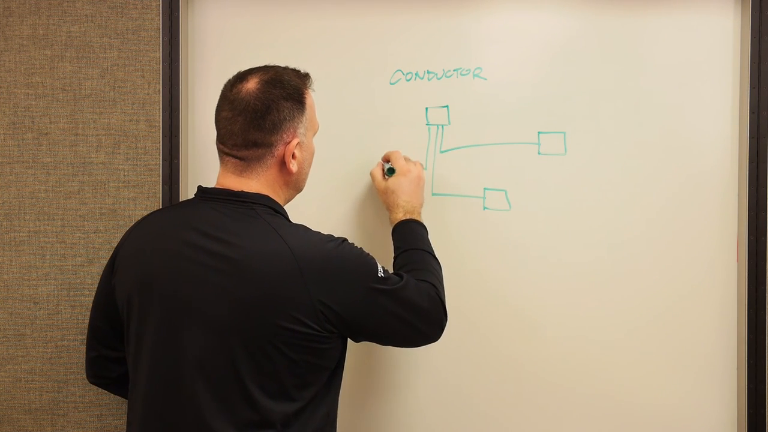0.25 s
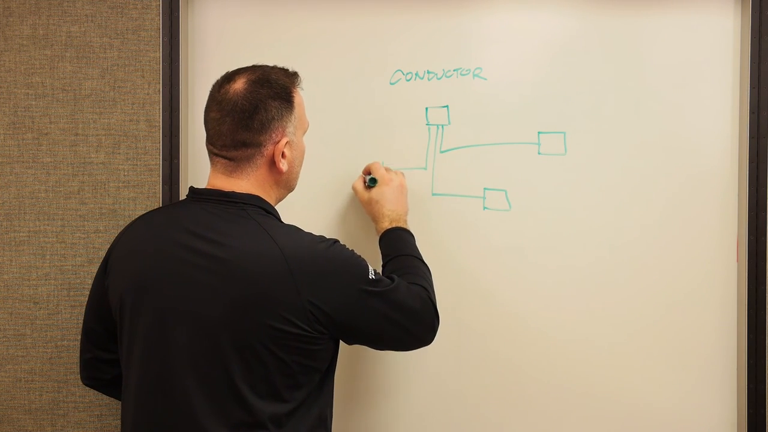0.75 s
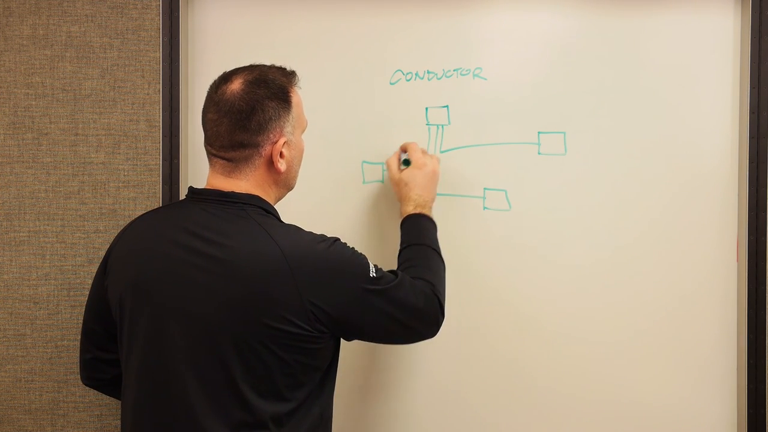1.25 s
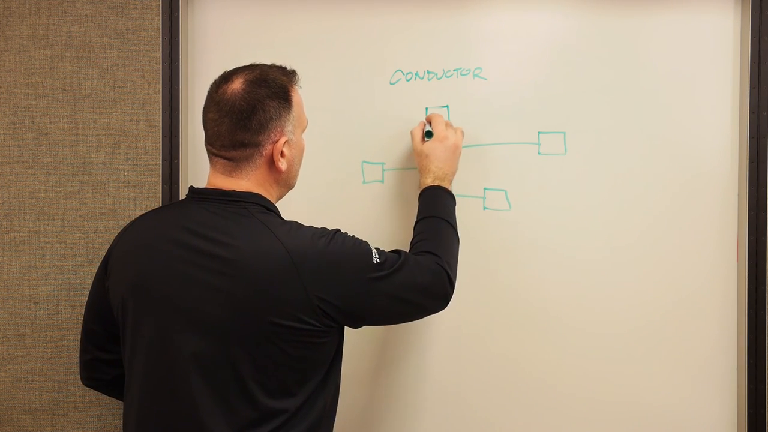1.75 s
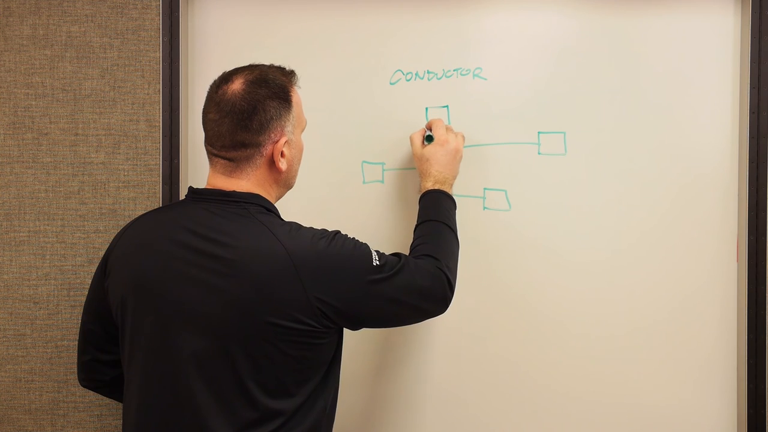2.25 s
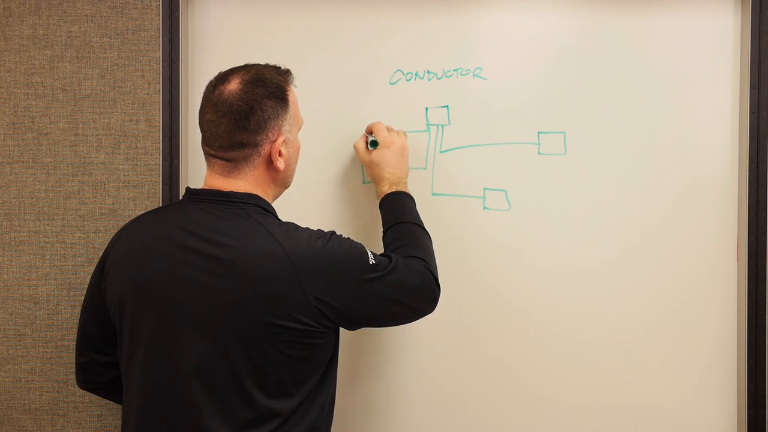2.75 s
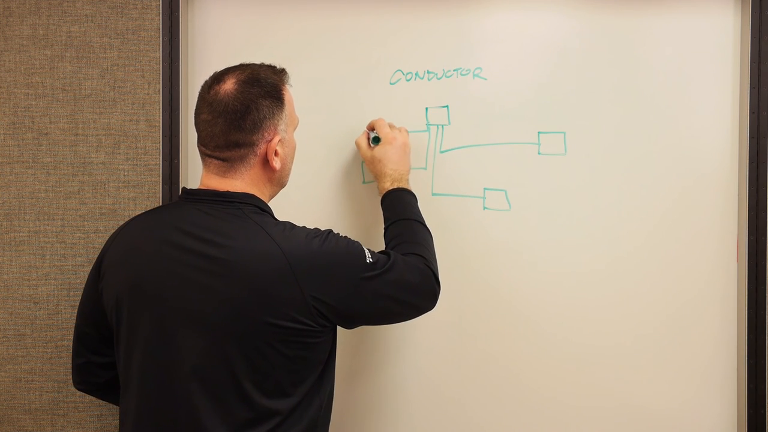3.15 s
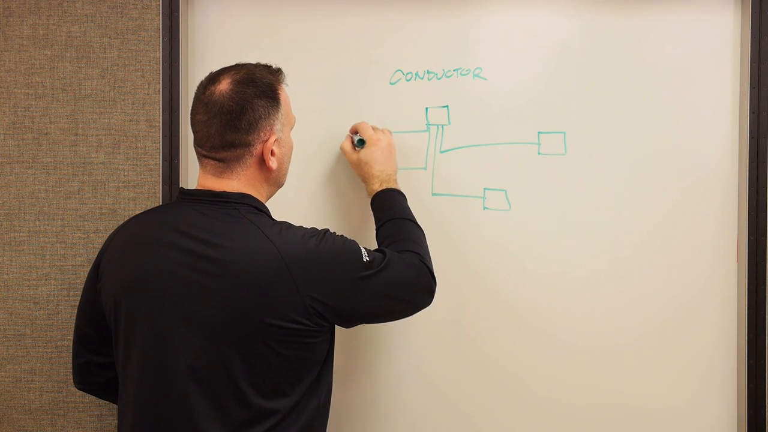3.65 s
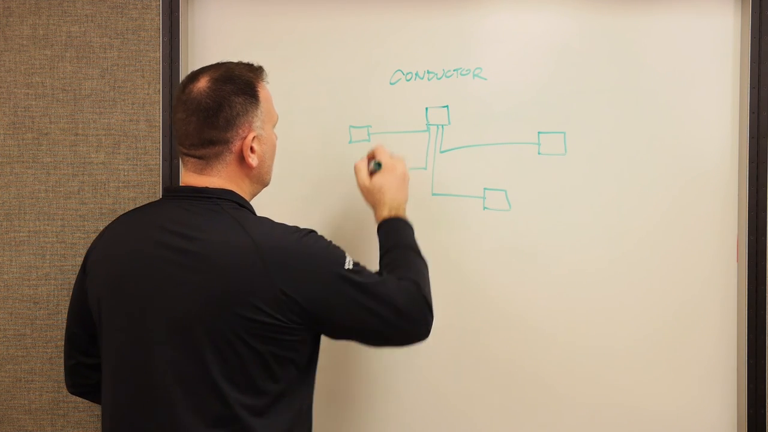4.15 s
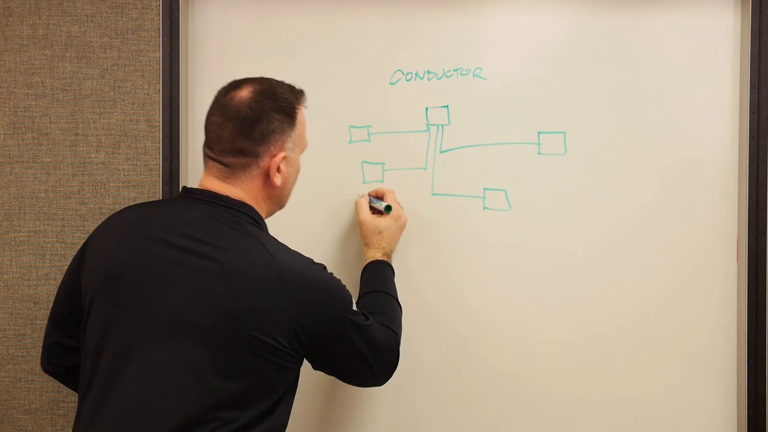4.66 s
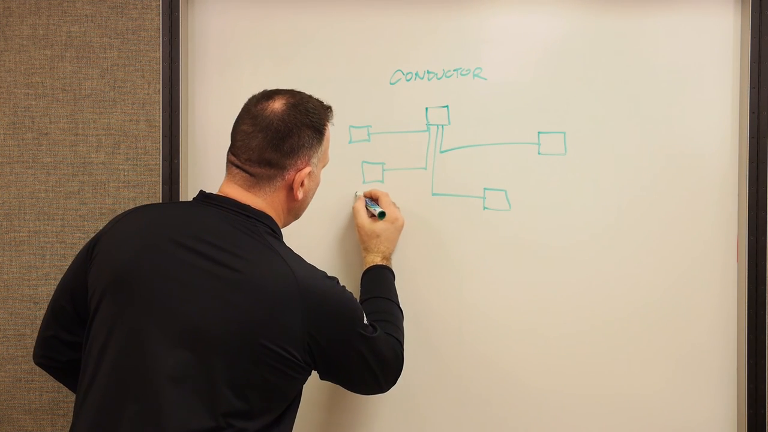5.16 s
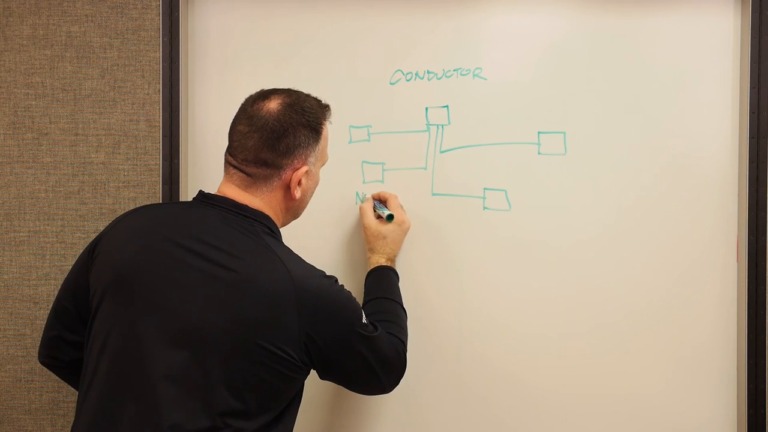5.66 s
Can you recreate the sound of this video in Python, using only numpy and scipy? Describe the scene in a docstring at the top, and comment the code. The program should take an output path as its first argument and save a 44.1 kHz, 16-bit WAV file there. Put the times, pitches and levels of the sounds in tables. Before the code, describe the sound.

A felt-tip marker gives short squeaks and papery hisses on a whiteboard in a quiet room, with pauses, soft knocks and faint ventilation.

```python
"""In a small, quiet meeting room someone draws small boxes and a connecting line on a whiteboard.
The felt tip squeaks as it sticks and slips: each squeak is a gliding stack of eight overtones.
Between squeaks the sliding felt hisses (grainy coloured noise) and the panel rumbles (low noise and thumps).
The marker knocks and clicks (ringing tones and a short crack), a sleeve rustles and the arm bumps softly.
Close reflections, a short room tail, ventilation noise and a faint stereo hiss surround it all."""
import sys
import numpy as np
from scipy import signal
from scipy.fft import rfft, irfft, next_fast_len
from scipy.io import wavfile

SR = 44100
rng = np.random.default_rng(int(sys.argv[2]) if len(sys.argv) > 2 else 0)


def master(y):
    """Save y as 16-bit WAV."""
    cut = np.clip(np.atleast_2d(y).T, -1, 1)
    pcm = np.round(cut * 32767)  # scale
    wavfile.write(sys.argv[1], SR, pcm.astype(np.int16))


N = 260190   # length in samples, 5.9 s


def from_db(db):
    """Turn decibels into a gain."""
    return 10 ** (np.asarray(db) / 20)


def rms_one(x):
    """Scale a signal to an rms (average strength) of one."""
    return x / np.sqrt(np.mean(x ** 2) + 1e-20)


def at_hz(points, hz):
    """Read a spectrum in dB at any frequency, with straight lines on a log-frequency axis."""
    known_hz, db = np.transpose(points)
    return np.interp(np.log(np.maximum(hz, 1)), np.log(known_hz), db)


def coloured(x, spectrum):
    """Filter a signal so that each frequency gets the gain of the spectrum."""
    size = next_fast_len(len(x))
    gains = from_db(at_hz(spectrum, np.fft.rfftfreq(size, 1 / SR)))
    return irfft(rfft(x, size) * gains, size)[:len(x)]


def noise(spectrum):
    """Make steady coloured noise with an rms of one."""
    return rms_one(coloured(rng.standard_normal(N), spectrum))


def drift(rate_hz):
    """Wander slowly at random, with an rms of one: white noise through two equal low-pass steps."""
    r = np.exp(-2 * np.pi * rate_hz / SR)
    wander = signal.lfilter([1], [1, -2 * r, r * r], rng.standard_normal(N + SR))
    return rms_one(wander[SR:])   # the first second lets the filter settle


def swell(start_s, end_s, attack_s, release_s, change_db=0):
    """Gain of one gesture: it grows, holds while its level slowly changes, and dies away."""
    t = np.arange(N) / SR
    before = np.maximum(start_s - t, 0) / attack_s
    after = np.maximum(t - end_s, 0) / release_s
    change = from_db(np.interp(t, [start_s, end_s], [0, change_db]))
    return np.exp(-np.minimum(before + after, 20)) * change


def together(gains):
    """Add gains in power, as unrelated noises add."""
    return np.sqrt(sum(g ** 2 for g in gains))


BLOW_SPREAD_DB = 1.5   # random spread of each tone's strength from blow to blow


def struck(events, modes):
    """A struck object rings at its own tones; each blow excites every tone with a strength of its own."""
    s, level_db = np.transpose(events)
    spread_db = BLOW_SPREAD_DB * rng.standard_normal((len(s), len(modes)))
    strengths = from_db(level_db[:, None] + spread_db)
    out = np.zeros(N)
    for k, (hz, db, t60_s) in enumerate(modes):
        blows = np.full(N, 1e-18)   # a tiny floor instead of zeros
        sign = (-1) ** k   # neighbouring tones start in opposite directions
        blows[np.round(s * SR).astype(int)] = strengths[:, k] * from_db(db) * sign
        r = from_db(-60 / (t60_s * SR))   # decay per sample
        w = 2 * np.pi * hz / SR
        out += signal.lfilter([0, np.sin(w)], [1, -2 * r * np.cos(w), r * r], blows)
    return out


SWELL_DB, FADE_DB = 11.5, 14   # a squeak starts and ends this far under its crest
SWELL_SHAPE, FADE_SHAPE = 1.5, 1.1   # powers that round the two sides of its arch


def arch(u, crest):
    """Level in dB along a squeak (u runs 0-1): it swells to its crest and fades."""
    crest = np.clip(crest, .02, .98)
    before = np.maximum(1 - u / crest, 0)
    after = np.maximum((u - crest) / (1 - crest), 0)
    return -SWELL_DB * before ** SWELL_SHAPE - FADE_DB * after ** FADE_SHAPE


def glide(start_s, length_s, first_hz, last_hz, bend, crest, overtone_crest, first_db, even_db, odd_db, count=41):
    """Course of one squeak, a bent glide under an arch of level, in rows like the wavering squeak's."""
    u = np.linspace(0, 1, count)
    pitch = first_hz + (last_hz - first_hz) * u / (u + abs(bend) * (1 - u))
    fundamental = first_db + arch(u, crest)
    overtones = arch(u, overtone_crest)
    return np.transpose([start_s + length_s * u, pitch, fundamental, even_db + overtones, odd_db + overtones])


# Squeaks: the pitch glides up as the tip speeds up and down as it brakes; slow slips make low chirps.
# Each row: start in seconds, length in seconds, first pitch in Hz, last pitch in Hz,
# bend (under 1 glides early, over 1 late), loudest point of the fundamental (0-1 of the length),
# loudest point of the overtones (0-1), relative levels of fundamental, even and odd overtones in dB,
# and the change for each overtone above the fourth in dB.
SQUEAK_GLIDES = [(0.0, 0.01, 1677, 1457, 3.4, 0.38, 0.07, -17.5, -29, -33.5, -1),
                 (0.015, 0.017, 1274, 760, 1.75, .3, .2, -23.5, -47, -51, -1),
                 (0.456, 0.008, 1790, 1593, 0.28, 0.73, 0.6, -46, -53.5, -63, -4),
                 (0.522, .068, 1648, 1918, 0.96, 0.42, 0.23, -37.5, -42, -42.5, -15),
                 (0.667, 0.02, 1830, 1523, 1.5, 0.34, 0.56, -31.5, -35, -37.5, -3.5),
                 (0.691, 0.013, 1425, 1026, 0.67, 0.11, 0.1, -38.5, -70, -62, -8),
                 (0.759, 0.091, 1633, 1883, 1.78, 0.87, 0.79, -33, -33.5, -33, -0.6),
                 (0.924, .051, 1756, 1308, 2.5, 0.69, 0.85, -35, -43, -38.5, 0.9),
                 (0.973, 0.015, 1392, 1814, 1.08, 1, 0.8, -44.5, -53.5, -64, -2),
                 (2.443, 0.02, 895, 1540, 0.5, 1, 1, -51, -59.5, -54, -13),
                 (2.465, 0.044, 1610, 1800, 0.65, 0.33, 0.37, -35, -37.5, -47, -9.5),
                 (2.782, 0.017, 1732, 1520, 1.5, 0.44, 0.62, -42.5, -42, -49.5, -3),
                 (2.795, .026, 1465, 724, 0.46, 0.16, 0.3, -27, -46, -56, -4.5),
                 (3.397, 0.04, 1780, 1852, .4, 0.14, .4, -63, -71, -88, -5),
                 (3.549, 0.016, 1780, 1570, 0.59, .55, 0.3, -44, -54.5, -75, -7),
                 (3.818, 0.023, 1326, 1076, 3.7, 0.73, 0.94, -41.5, -62, -62, -6)]
# One longer squeak wavers as the hand hesitates. Each row: time in seconds, slip rate in Hz,
# then relative levels of the fundamental, even overtones and odd overtones in dB.
WAVERING_COURSE = [(3.607, 1400, -48, -58, -46), (3.615, 1410, -49, -72, -49), (3.621, 1676, -55, -41, -51),
                   (3.633, 1643, -46.5, -41, -46), (3.642, 1340, -48.5, -57, -45),
                   (3.657, 1307, -42.5, -55, -42), (3.665, 1578, -31.5, -40.5, -33),
                   (3.676, 1681, -33, -42.5, -38), (3.693, 1788, -35.5, -41.5, -45),
                   (3.702, 1850, -44, -50.5, -63)]
WAVERING_SOFTNESS_DB = -1.3   # per overtone above the fourth
# The fundamental is strongest near the tip's resonance. Each row: pitch in Hz, gain in dB.
TIP_RESONANCE = [(750, -6), (1100, -0.5), (1400, 0.5), (1640, -1.5), (1720, -0.5), (1810, 2), (1920, 6)]
# How tip and barrel give off the overtones. Each row: frequency in Hz, gain in dB.
BARREL_RESPONSE = [(1700, -0.5), (2700, 2), (3350, 1.5), (4300, -9.5), (5300, -4), (5900, 2), (6750, 0),
                   (7700, -7.5), (8700, -8.5), (9500, -21.5), (12000, -28), (14000, -45.5)]
PURE_HZ, PURE_DB_PER_HZ = 1817, -0.0583   # faster slips than this lose their overtones


def squeaks(jitter, shimmer_db, slow_hz, slow_roughness, slow_rounding_db, attack_s, release_s, level_db, count=8):
    """The tip sticks and slips in a steady cycle, which grows ragged and round when the slips come slowly."""
    t, out = np.arange(N) / SR, np.zeros(N)
    wobble = drift(500)
    flutter = [drift(160) for _ in range(count)]
    courses = [(glide(*row[:-1]), row[-1]) for row in SQUEAK_GLIDES]
    courses.append((WAVERING_COURSE, WAVERING_SOFTNESS_DB))
    for rows, softness_db in courses:
        s, slip_hz, first_db, even_db, odd_db = np.transpose(rows)
        on = (t > s[0] - attack_s) & (t < s[-1] + release_s)
        now = t[on]
        pitch = np.interp(now, s, slip_hz)
        slow = np.clip(1 - pitch / slow_hz, 0, 1)
        uneven_pitch = pitch * (1 + (jitter + slow_roughness * slow) * wobble[on])
        phase = 2 * np.pi * np.cumsum(uneven_pitch) / SR
        fade_in = 1 + (now - s[0]) / attack_s
        fade_out = 1 - (now - s[-1]) / release_s
        gate = np.clip(np.minimum(fade_in, fade_out), 0, 1) ** 2
        for k in range(1, count + 1):   # k = 1 is the fundamental
            course_db = first_db if k == 1 else odd_db if k % 2 else even_db
            db = np.interp(now, s, course_db)
            if k == 1:
                db = db + at_hz(TIP_RESONANCE, pitch)
            else:
                db = db + PURE_DB_PER_HZ * np.maximum(pitch - PURE_HZ, 0)
                db = db + at_hz(BARREL_RESPONSE, k * pitch)
                db = db + max(k - 4, 0) * softness_db
                db = db + (k - 2) * slow * slow_rounding_db
            lag = np.pi * k * k / count   # the barrel delays each overtone differently
            gain = gate * from_db(db + shimmer_db * flutter[k - 1][on])
            out[on] += gain * np.sqrt(2) * np.cos(k * phase - lag)
    return from_db(level_db) * out


# Strokes of the felt on the board, which also make the panel rumble.
# Each row: start in seconds, end in seconds, relative hiss level in dB,
# relative panel rumble level in dB, change of level along the stroke in dB.
PEN_STROKES = [(0.0, 0, -75, -51.5, 3), (0.393, 0.453, -69.5, -67.5, 6.5), (0.556, 0.657, -50.5, -51, -1.5),
               (0.807, 0.903, -52.5, -49, -4.5), (0.945, 1.004, -65, -57, 3.5),
               (1.017, 1.137, -60, -69, -0.5), (2.504, 2.787, -49, -51, -4.5), (3.438, 3.537, -59, -61, 3),
               (3.657, 3.701, -52, -49, -1), (3.73, 3.858, -74.5, -66.5, 7), (3.902, 4.007, -63.5, -77, 5)]
# Colour of the felt sliding on its flat, broader and lower.
# Each row: frequency in Hz, relative level per hertz in dB.
FLAT_FELT_COLOUR = [(600, -28.5), (1500, 0), (1850, -3), (2400, -16.5), (3400, -3), (4300, -12.5),
                    (4950, -15.5), (5300, -3.5), (5800, 1), (6800, 3), (7200, -6.5), (7700, -1.5),
                    (9200, -18), (11000, -36)]
# Colour of the felt sliding on its edge. Each row: frequency in Hz, relative level per hertz in dB.
EDGE_FELT_COLOUR = [(600, -37), (1550, -12), (1900, -10.5), (2150, -7), (2950, -19), (3550, -5.5),
                    (4200, -15), (5500, -16.5), (6100, 4.5), (6900, 1), (7700, -5.5), (8600, -21),
                    (9500, -15.5), (10600, -49)]
# The tip sings faintly near its resonance while it slides.
# Each row: frequency in Hz, relative level per hertz in dB.
SINGING_COLOUR = [(1600, -29.5), (1800, -7.5), (1890, 3.5), (1980, -7.5), (2200, -29.5), (3400, -28.5),
                  (3700, -11.5), (4000, -28.5), (5000, -51.5)]
TIP_TURNS_S = 1.8   # flat of the tip before this time, edge after it
FELT_GRAIN_DB = 1.7   # random unevenness of the snags
STROKE_ATTACK_S, STROKE_RELEASE_S = 0.015, .014   # time constants of the hiss


def sliding_felt(level_db, singing_db):
    """Fibres snag at random and excite tip and barrel; the first box is drawn with the flat of the tip."""
    drag = together(from_db(db) * swell(start, end, STROKE_ATTACK_S, STROKE_RELEASE_S, change)
                    for start, end, db, _, change in PEN_STROKES)
    snags = rng.standard_normal(N) * from_db(FELT_GRAIN_DB * drift(161))
    flat = rms_one(coloured(snags, FLAT_FELT_COLOUR))
    edge = rms_one(coloured(snags, EDGE_FELT_COLOUR))
    hiss = np.where(np.arange(N) / SR < TIP_TURNS_S, flat, edge)
    singing = from_db(singing_db) * noise(SINGING_COLOUR)
    return from_db(level_db) * drag * (hiss + singing)


# Moves of the arm, which stir the panel and rustle the sleeve. Each row: time in seconds,
# time constant in seconds, relative sleeve rustle level in dB, relative low rumble level in dB.
ARM_GESTURES = [(2.26, .17, -77, -60.5), (4.001, 0.34, -74.5, -60.5), (4.34, .07, -97.5, -58),
                (4.588, 0.038, -58.5, -56), (4.705, 0.094, -70.5, -56.5), (5.065, .02, -74.5, -61),
                (5.43, 0.065, -85.5, -65), (5.53, 0.055, -72, -75), (5.635, 0.017, -82, -74)]
# Colour of the rumble. Each row: frequency in Hz, relative level per hertz in dB.
RUMBLE_COLOUR = [(20, -14.5), (33, -10), (45, -10), (58, -6.5), (74, 5), (86, 1), (110, -3.5), (125, 1),
                 (146, -2), (175, -8), (260, -9), (400, -17.5), (900, -18.5), (2000, -37)]
# The tip catching or letting go nudges the whole panel. Each row: time in seconds, strength in dB.
PANEL_NUDGES = [(.012, -52.5), (.675, -50.5), (2.792, -55), (3.665, -55)]
# Tones of the nudged panel. Each row: frequency in Hz, relative level in dB, seconds to fall by 60 dB.
PANEL_TONES = [(29.9, 3, .12), (46, -3, 0.23), (69, -1.5, 0.27)]
PANEL_ATTACK_S, PANEL_RELEASE_S, PANEL_REST_DB = 0.067, 0.13, -72.5   # time constants, level at rest


def panel(level_db):
    """The board drums softly while it is rubbed or the arm moves, and thumps when the tip nudges it."""
    rubbed = [from_db(db) * swell(start, end, PANEL_ATTACK_S, PANEL_RELEASE_S, change)
              for start, end, _, db, change in PEN_STROKES]
    stirred = [from_db(db) * swell(s, s, width, width) for s, width, _, db in ARM_GESTURES]
    motion = together(rubbed + stirred + [from_db(PANEL_REST_DB)])
    rumble = from_db(level_db) * motion * noise(RUMBLE_COLOUR)
    return rumble + struck(PANEL_NUDGES, PANEL_TONES)


# Ventilation and microphone hiss. Each row: frequency in Hz, relative level per hertz in dB.
AIR_COLOUR = [(20, -3.5), (45, 7.5), (60, 7), (73, 14), (90, 12.5), (125, 5), (145, 15), (180, 7), (260, 5),
              (400, -2.5), (900, -3), (2500, -4), (8000, -5), (16000, -7)]


def air(level_db):
    """Ventilation and microphone hiss make a steady coloured noise."""
    return from_db(level_db) * noise(AIR_COLOUR)


# Hiss that differs between the channels. Each row: frequency in Hz, relative level per hertz in dB.
SIDE_HISS_COLOUR = [(35, -10.5), (90, -9.5), (350, 2), (700, 1.5), (1400, -2), (3000, -0.5), (15000, -0.5)]


def side_hiss(level_db):
    """The same noise goes to both channels with opposite signs, so it sounds wide."""
    return from_db(level_db) * noise(SIDE_HISS_COLOUR) * np.array([[1], [-1]])


# Reflections from nearby surfaces. Each row: delay in seconds, level in dB.
CLOSE_ECHOES = [(.0031, -26.5), (.0074, -10), (0.0119, -13)]
# Colour of the reverberation. Each row: frequency in Hz, gain in dB.
TAIL_COLOUR = [(200, -5), (850, -15.5), (1150, -20), (1600, -16), (1900, -14.5), (3400, -22), (5000, -20),
               (7000, -30.5), (14000, -34)]
ROOM_T60_S = 0.26   # time in which the tail falls by 60 dB


def room(x, first_wall_s, build_s):
    """A few close, dulled reflections, then a short diffuse tail that is weak in the treble."""
    t = np.arange(SR // 2) / SR
    tail = rng.standard_normal(len(t)) * from_db(-60 * t / ROOM_T60_S)
    tail *= np.clip((t - first_wall_s) / build_s, 0, 1)
    response = coloured(tail / np.linalg.norm(tail), TAIL_COLOUR)
    dull = signal.sosfilt(signal.butter(1, 3000, fs=SR, output="sos"), x)
    samples = np.arange(N)
    early = sum(from_db(db) * np.interp(samples - delay * SR, samples, dull, left=0)
                for delay, db in CLOSE_ECHOES)
    return x + early + signal.fftconvolve(x, response)[:N]


# The marker knocks, landing on the board or shifting in the fingers.
# Each row: time in seconds, relative strength in dB.
MARKER_CLICKS = [(0.5153, -39.5), (3.6064, -45), (4.2674, -43), (4.2869, -32), (4.309, -44), (5.435, -47.5)]
# Tones of the marker. Each row: frequency in Hz, relative level in dB, seconds to fall by 60 dB.
MARKER_TONES = [(986, -2, 0.044), (1310, -9, 0.02), (1656, 4, 0.0088), (1950, -8, 0.02), (2470, -9, 0.01),
                (3100, -19.5, .01), (3960, -13, .012), (5600, -31, .01)]
# The brief rattle of each knock. Each row: frequency in Hz, relative level per hertz in dB.
CRACK_COLOUR = [(400, -30.5), (950, 2), (1500, 5.5), (2500, -1), (4500, -14), (8000, -39)]


def marker_knocks(ring_db, crack_db, crack_t60_s):
    """Hard plastic rattles for a few milliseconds and sets the barrel ringing."""
    t = np.arange(N) / SR
    burst = sum(from_db(db - 60 * np.abs(t - s) / crack_t60_s) * (t >= s) for s, db in MARKER_CLICKS)
    crack = from_db(crack_db) * burst * noise(CRACK_COLOUR)
    return from_db(ring_db) * struck(MARKER_CLICKS, MARKER_TONES) + crack


# Colour of rubbing cloth. Each row: frequency in Hz, relative level per hertz in dB.
CLOTH_COLOUR = [(150, -16), (400, 0), (900, -4.5), (1900, -6), (2600, -12.5), (4500, -19), (8000, -31)]


def sleeve(level_db):
    """Cloth rubs on cloth in uneven little bursts."""
    rustle = together(from_db(db) * swell(s, s, width, width) for s, width, db, _ in ARM_GESTURES)
    crinkle = from_db(3 * drift(90))
    return from_db(level_db) * rustle * crinkle * noise(CLOTH_COLOUR)


# Soft bumps of the arm against the body. Each row: time in seconds, relative strength in dB.
ARM_BUMPS = [(4.342, -62), (4.708, -49), (4.745, -55.5), (4.82, -60), (5.063, -60)]
# Tones of a bump. Each row: frequency in Hz, relative level in dB, seconds to fall by 60 dB.
BUMP_TONES = [(131, -13, .04), (241, 4, 0.031), (387, -0.5, 0.028), (590, 3.5, 0.032), (1114, -18, .015)]


def arm_bumps(level_db):
    """The arm bumps softly against the body: low tones that die away within hundredths of a second."""
    return from_db(level_db) * struck(ARM_BUMPS, BUMP_TONES)


def scene():
    """Everything reaches one microphone; only a faint hiss differs between the channels."""
    tip = squeaks(jitter=0.0024, shimmer_db=1.44, slow_hz=1610, slow_roughness=.1, slow_rounding_db=-10,
                  attack_s=.004, release_s=.005, level_db=0.21)
    tip = tip + sliding_felt(level_db=-2.8, singing_db=-15.0)
    hand = marker_knocks(ring_db=-8.0, crack_db=-13, crack_t60_s=0.034)
    arm = sleeve(level_db=0.0) + arm_bumps(level_db=-4.5)
    near = room(tip + hand + arm, first_wall_s=0.022, build_s=.009)
    mono = near + panel(level_db=0.0) + air(level_db=-64.5)
    return mono + side_hiss(level_db=-73)


CUTOFF_HZ = 15750


def record(dry):
    """A steep low-pass filter cuts off the top of the treble."""
    return signal.sosfilt(signal.ellip(12, .1, 80, CUTOFF_HZ, fs=SR, output="sos"), dry)


dry = scene()
out = record(dry)
master(out)
```